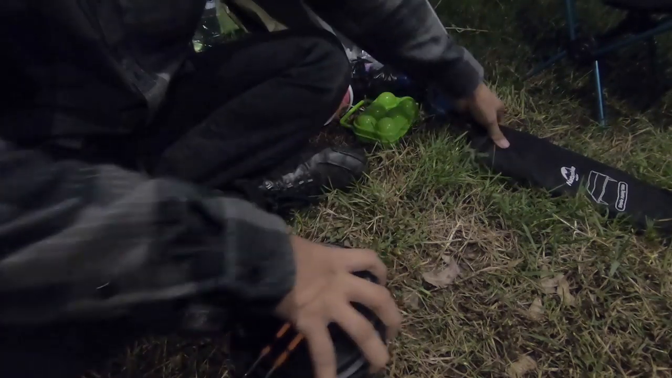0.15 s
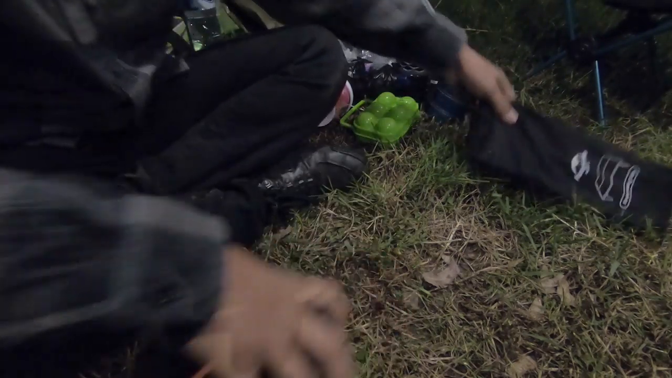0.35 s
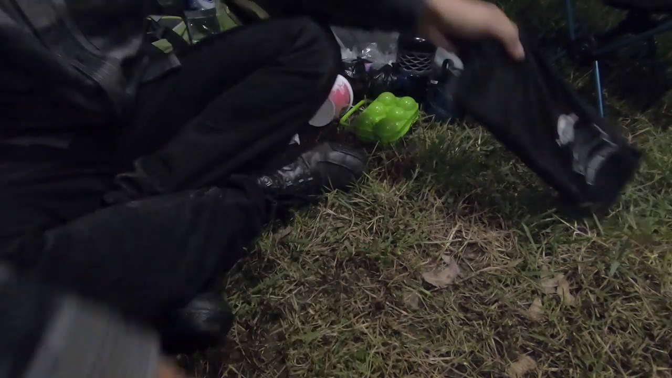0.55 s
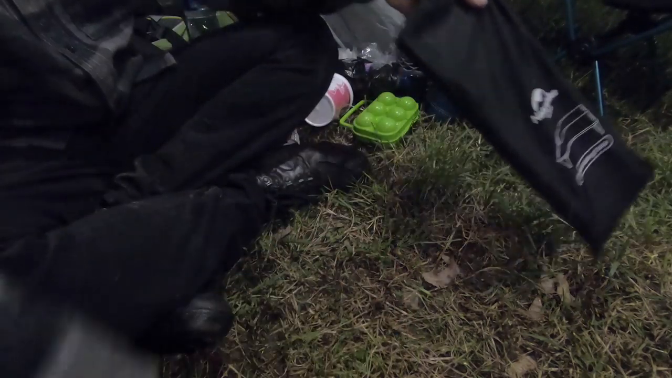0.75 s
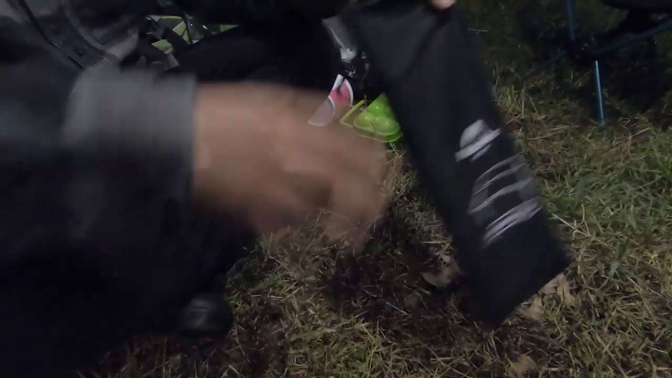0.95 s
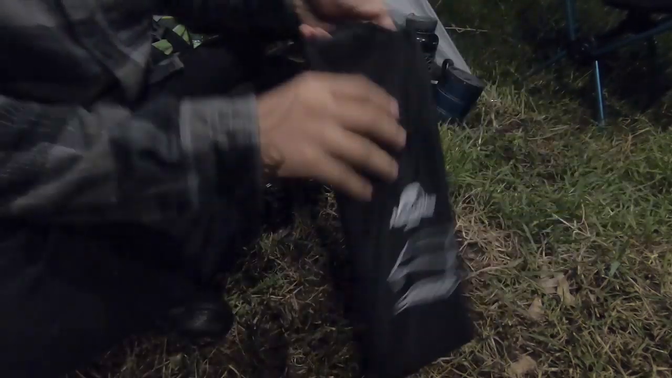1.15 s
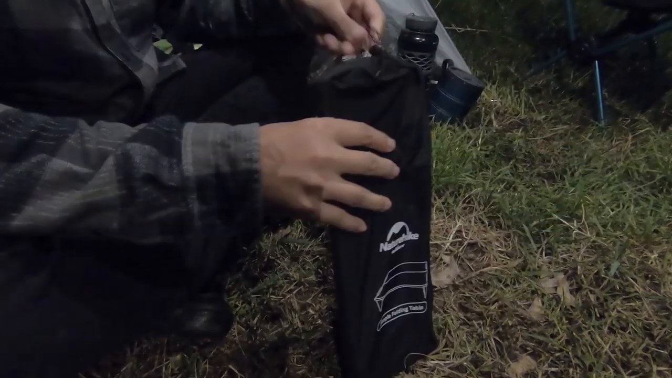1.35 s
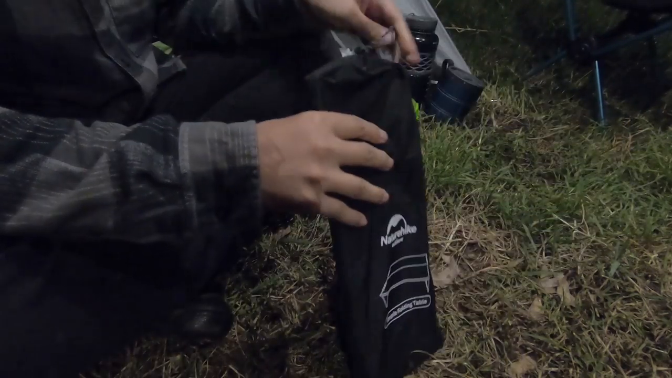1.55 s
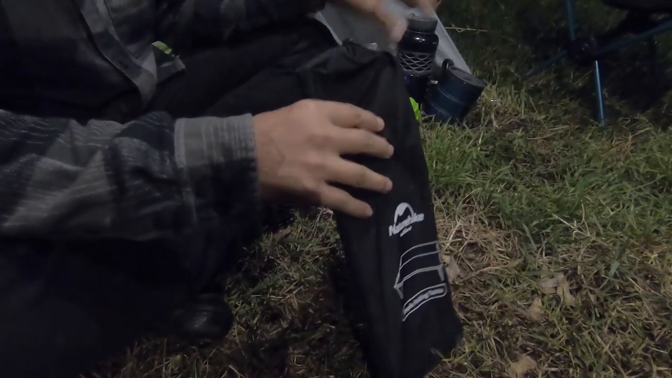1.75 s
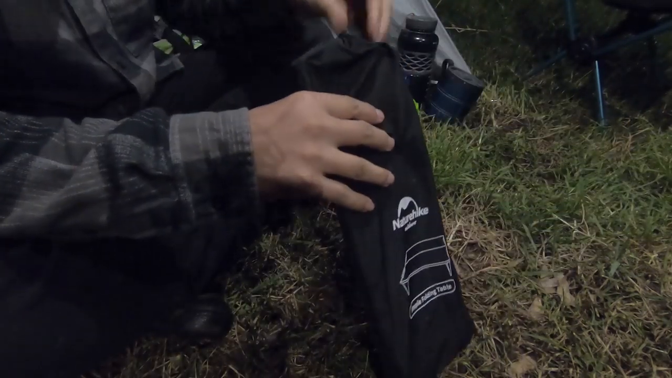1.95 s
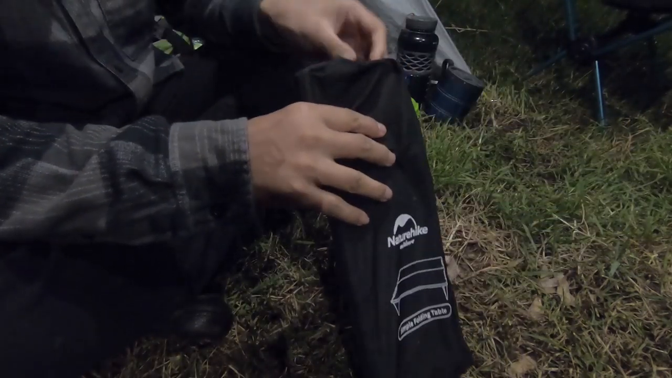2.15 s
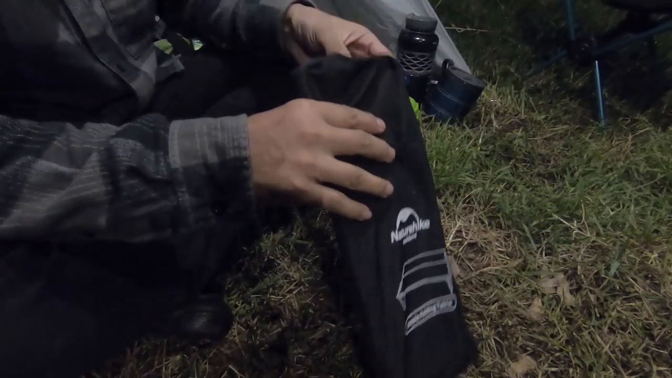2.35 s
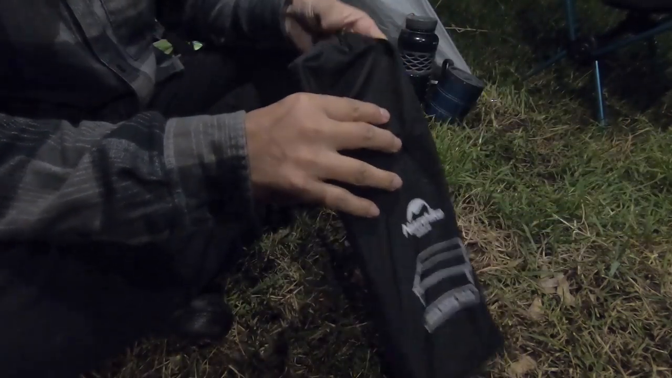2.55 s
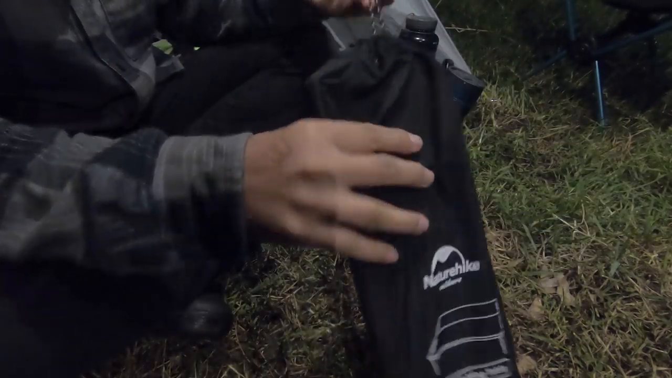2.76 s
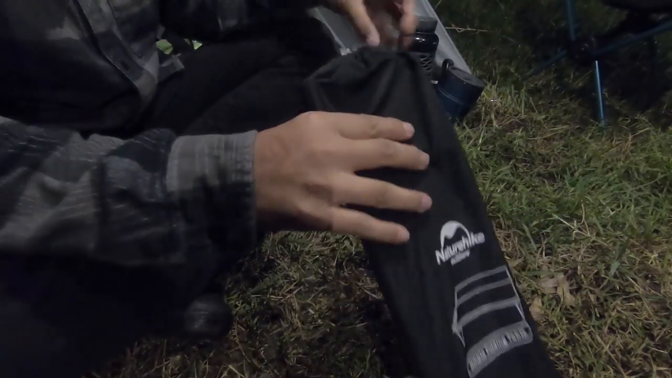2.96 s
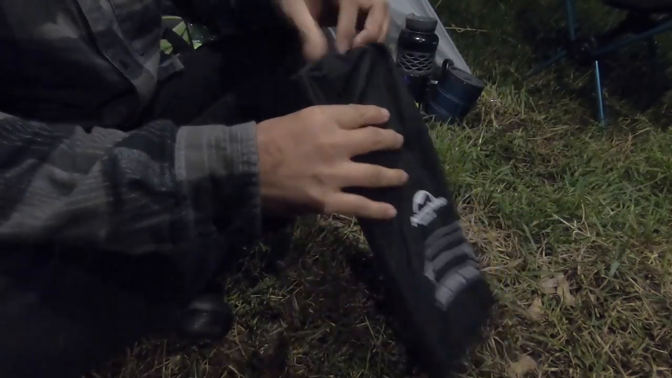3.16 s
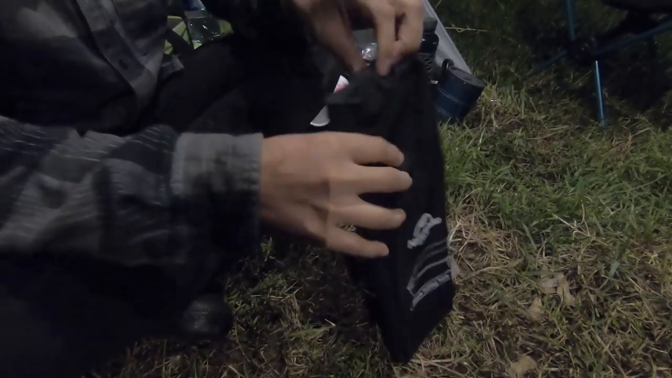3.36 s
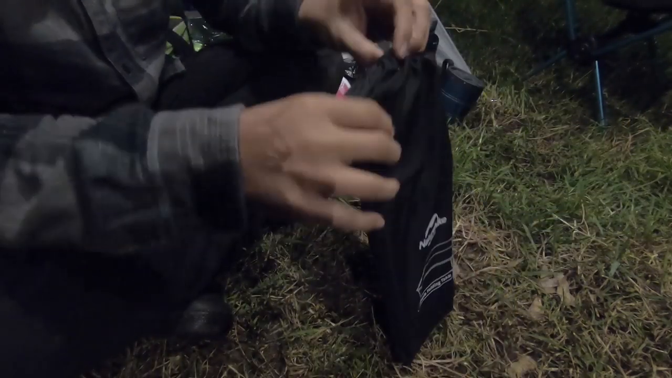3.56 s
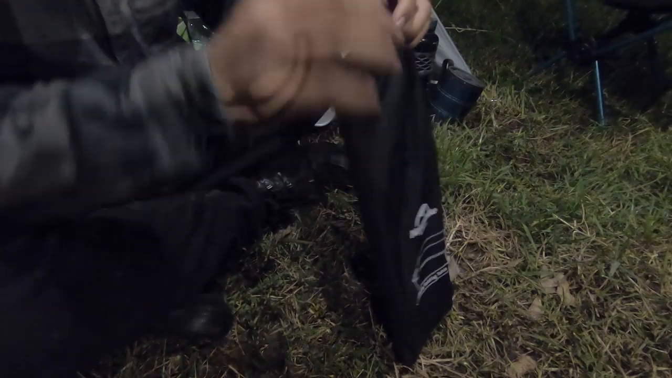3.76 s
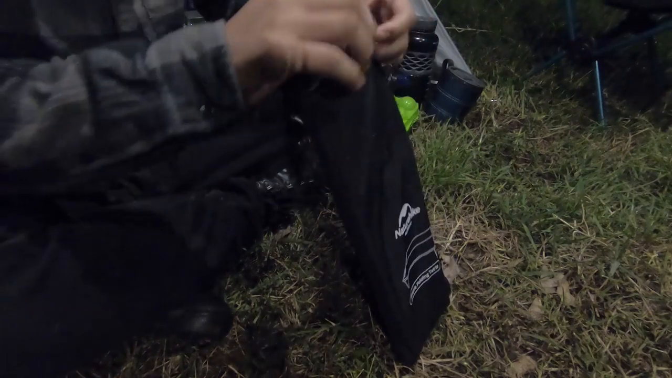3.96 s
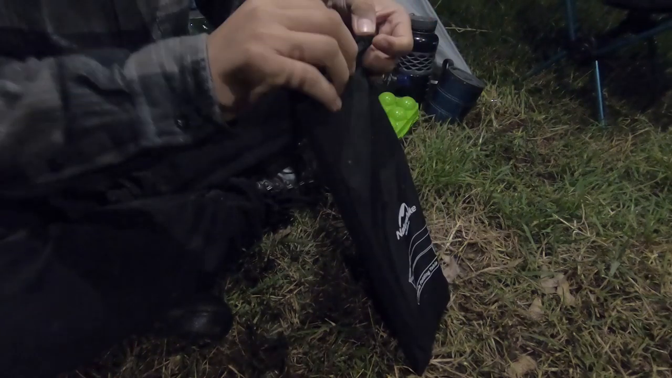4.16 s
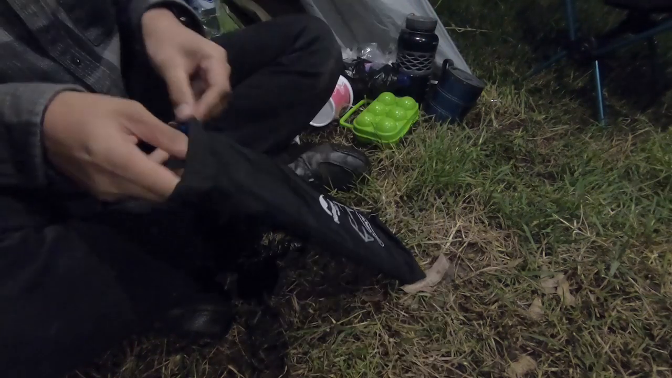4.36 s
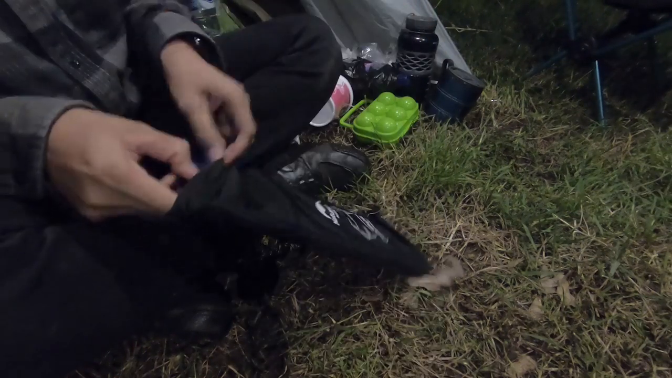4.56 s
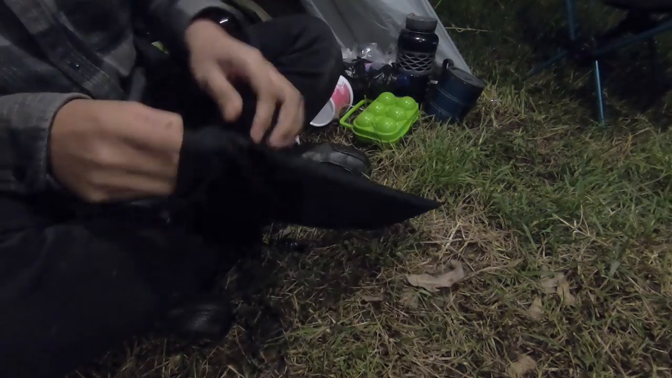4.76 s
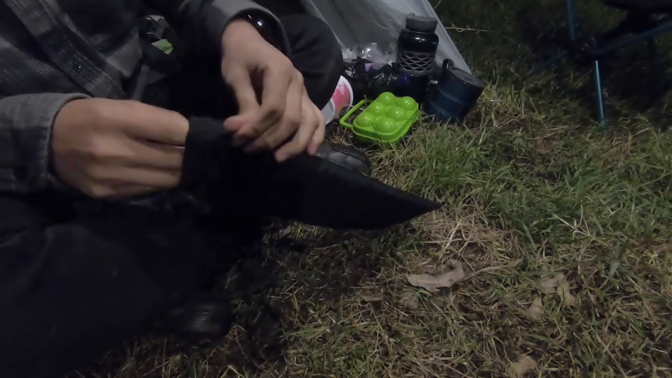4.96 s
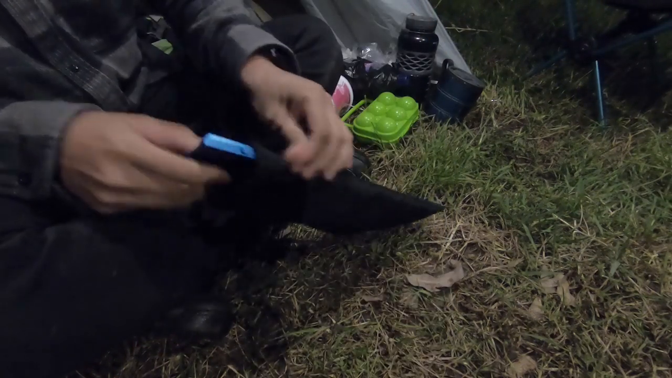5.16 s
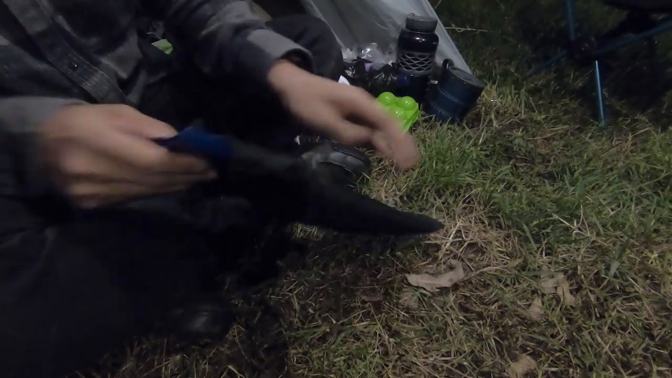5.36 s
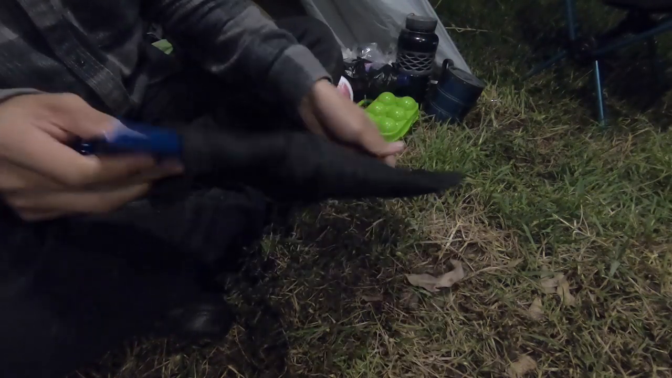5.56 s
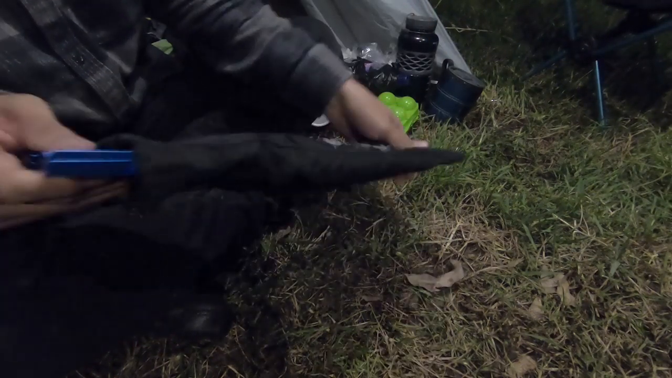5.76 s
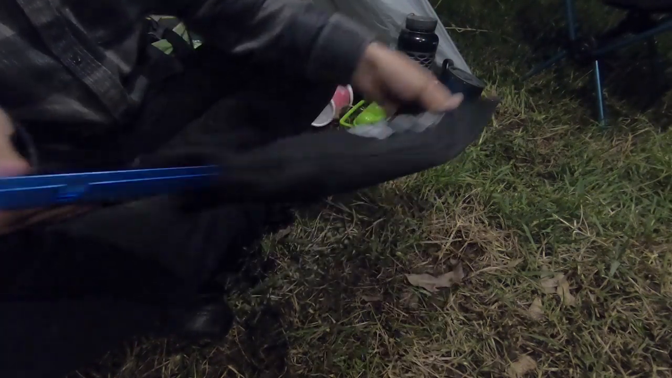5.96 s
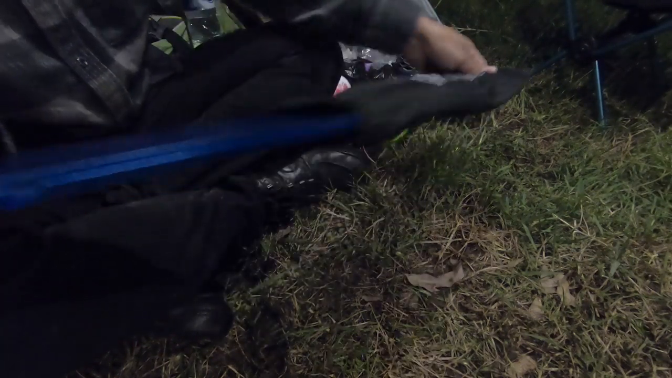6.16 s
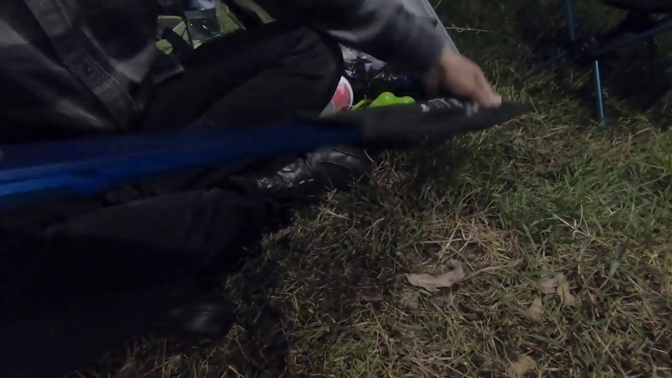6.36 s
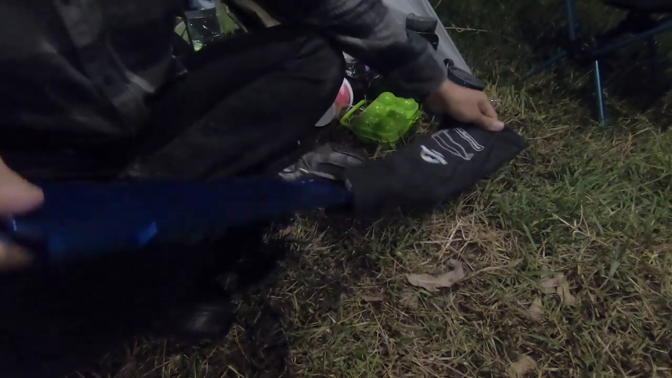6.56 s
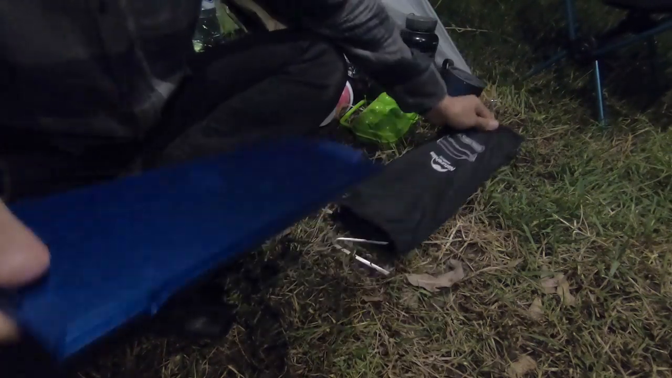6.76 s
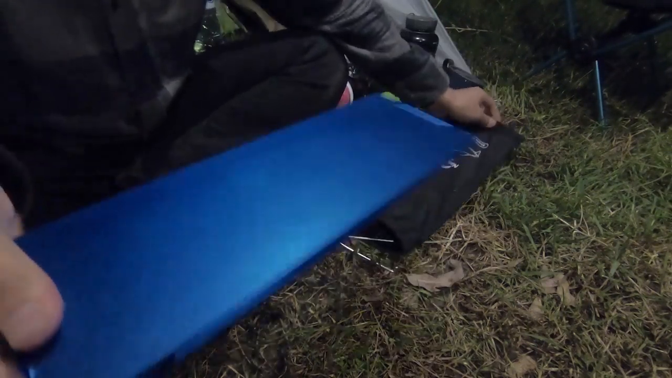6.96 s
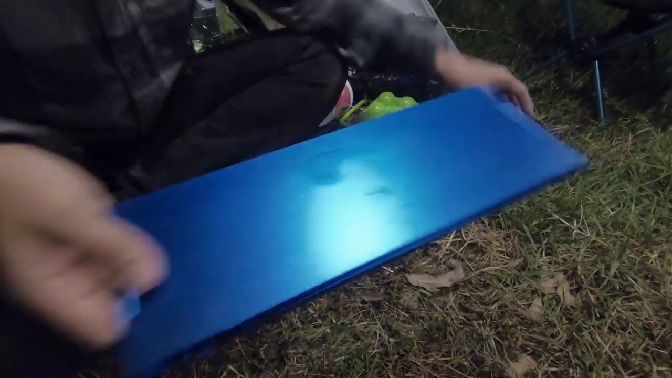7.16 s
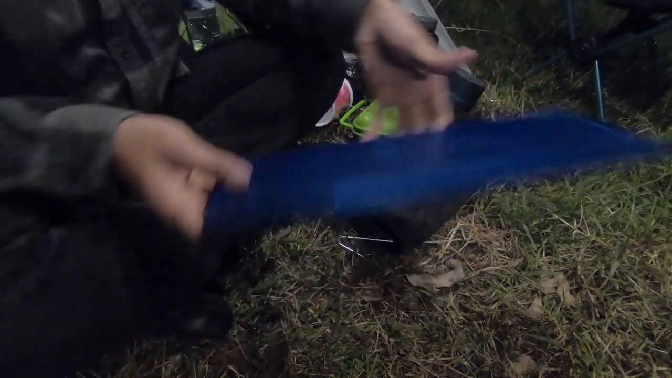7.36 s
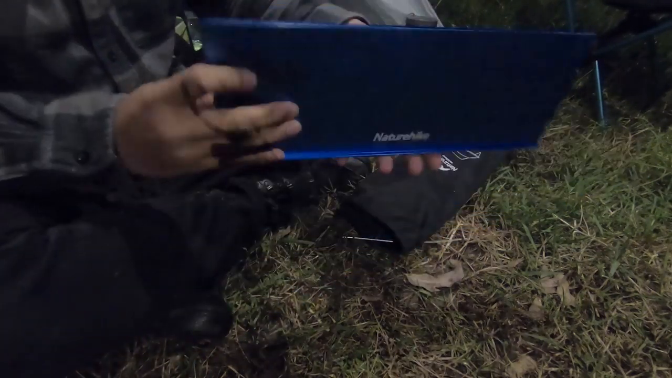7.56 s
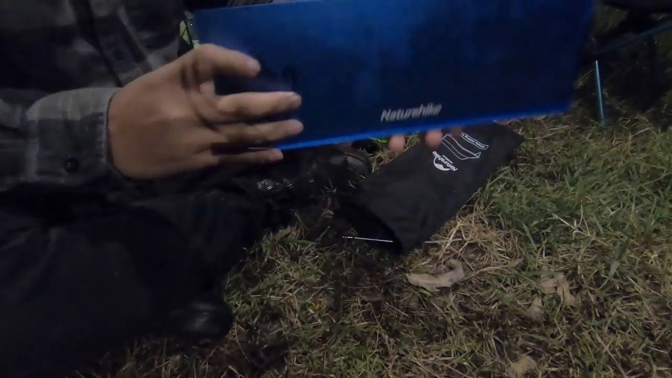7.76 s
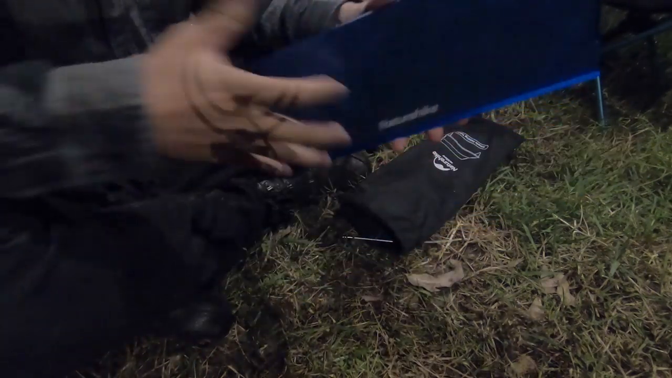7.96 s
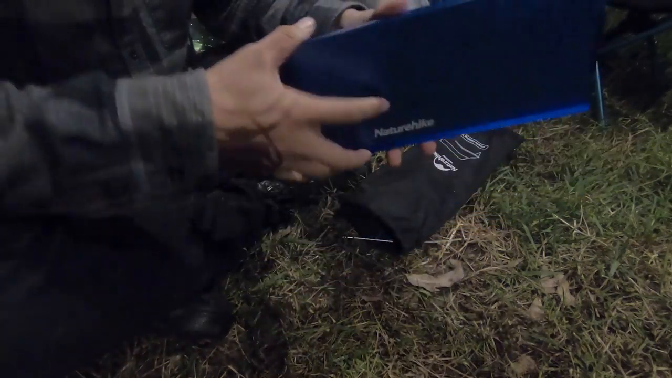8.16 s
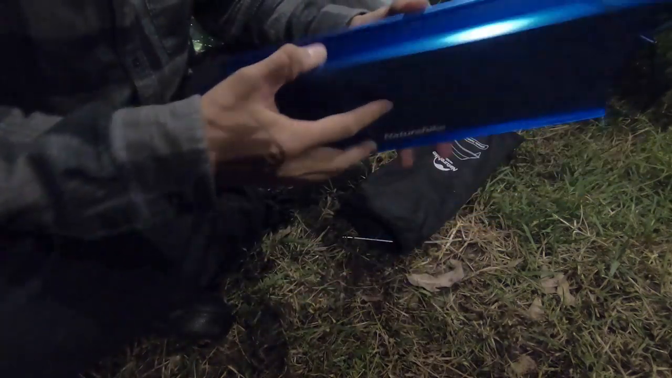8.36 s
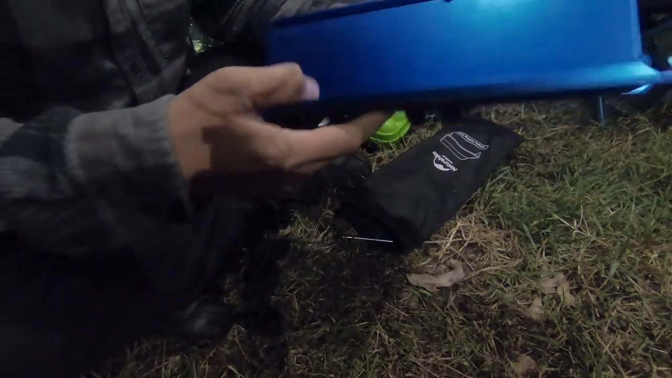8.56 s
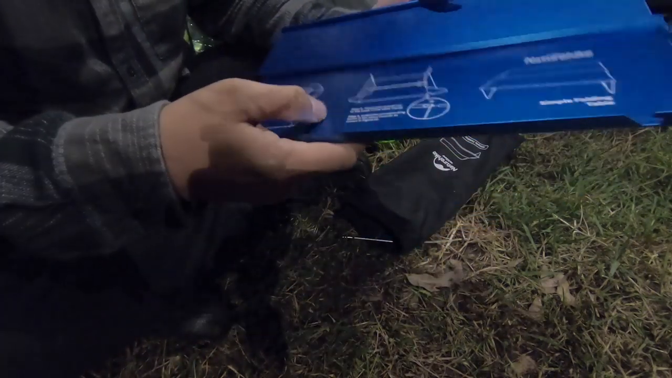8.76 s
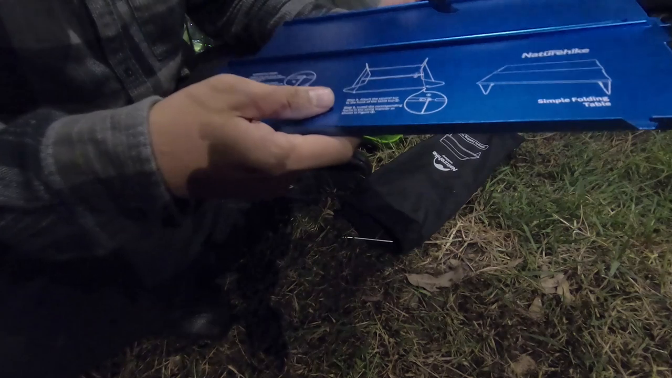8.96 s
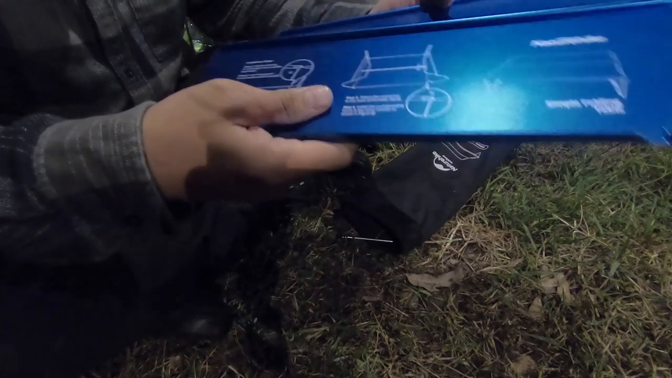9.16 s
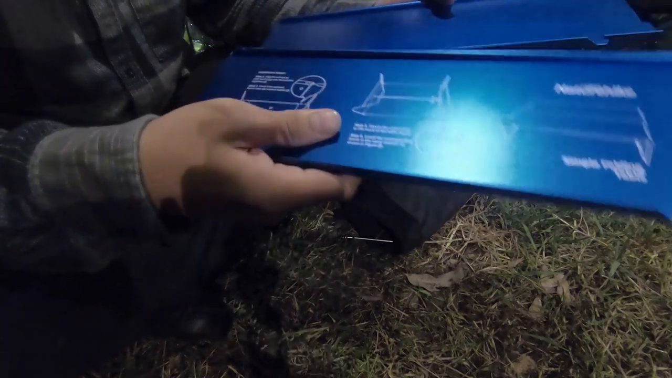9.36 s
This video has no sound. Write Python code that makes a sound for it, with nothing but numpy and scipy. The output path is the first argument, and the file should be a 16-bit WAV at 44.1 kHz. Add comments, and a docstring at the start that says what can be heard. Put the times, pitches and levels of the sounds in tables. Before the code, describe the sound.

Close by, a nylon sack is handled with soft rustles and a few dull knocks from the metal inside. About halfway, a folded metal camp table slides out with a loud, crackly scrape. Its thin panels then click, clack and ring briefly as they are opened. Crickets chirp throughout over a faint distant hum outdoors at night, and an occasional puff of air thumps the microphone.

```python
"""Unpacking a camp table at dusk

On a campsite lawn, hands lift a nylon sack, undo its cord, slide out a folded sheet-metal table and
open it. Cloth and metal crackle and scrape by stick-slip friction; knocks ring the panels' modes.
Puffs of air hit the right microphone port, and crickets chirp with their wings over a far hum."""
import sys
import numpy as np
from scipy import signal
from scipy.fft import rfft, irfft, next_fast_len
from scipy.io import wavfile
from scipy.ndimage import uniform_filter1d

SR = 44100
rng = np.random.default_rng(int(sys.argv[2]) if len(sys.argv) > 2 else 0)


def transcribe(u):
    """Save the signal u as a 16-bit wav file named by the first command-line argument.

    u: samples, shape (n,) or (channels, n), limited to [-1, 1]; the rate is SR.
    q: integer samples, one column per channel.
    """
    v = np.clip(np.atleast_2d(u).T, -1, 1)
    q = np.round(v * 32767).astype(np.int16)
    wavfile.write(sys.argv[1], SR, q)


N = 415422
FFT_SIZE = next_fast_len(N)
T, HZ = np.arange(N) / SR, np.fft.rfftfreq(FFT_SIZE, 1 / SR)
PULL_S, BARE_S, OPEN_S = 5.2, 7.3, 8.25  # the table starts to leave the sack; is out; is unfolded


def sack_and_table():
    """Source and filter: friction and impacts excite a treble band, a body band and the panel modes."""
    # Spectra and tints. Each row: frequency in Hz, relative level in dB.
    fizz = [(2500, -21.5), (3500, -21), (5000, -13.5), (6100, -1.5), (6900, 5), (8000, -4), (10500, -15.5),
            (13800, -31), (15000, -40), (15900, -74)]  # treble of rubbing, with the port resonance
    hollow = [(150, -17), (250, -11.5), (475, -24.5), (742, 1.5), (890, -0.5), (1340, 1), (1530, -1),
              (2080, 2.5), (4500, -1), (5850, -0.5), (9900, -120)]  # body of the sack and table
    scrape = [(300, -16), (800, -10), (1250, 1), (6500, -2.5), (11000, 4)]  # sliding metal is thinner and brighter than a knock
    muffled = [(350, 4.5), (1200, 0.5), (3500, -5)]  # the closed sack dulls the body
    flutter_db = .7 * drift(.008) + .7 * drift(.03)
    treble, body = gain_of(rubbing() + flutter_db)
    snap, struck = knocks()
    grit = creased(slips(per_s=24000, spread_db=1.2), patchy_db=4)
    pulled = T > PULL_S
    slide = colour(grit * treble * pulled, fizz, scrape) + colour(grit * body * pulled, hollow, scrape)
    packed = colour(grit * np.sqrt(body ** 2 + struck) * ~pulled, hollow, muffled)
    crackle = colour(grit * np.sqrt(snap + treble ** 2 * ~pulled), fizz)
    clatter = colour(grit * np.sqrt(struck) * pulled, hollow)
    drive = grit[0] * np.sqrt(struck + 0.092 * body ** 2)  # blows ring the metal more than rubbing does
    folded = gain_of(-15) * panels(drive, BARE_S, OPEN_S, t60_at_1k=.09)  # stacked panels damp each other
    unfolded = gain_of(0.5) * panels(drive, OPEN_S, T[-1], t60_at_1k=0.33)
    return ports(slide + packed + crackle + clatter + folded + unfolded + thuds())


def rubbing():
    """Incoherent sources add in power: strokes over a faint rustle give treble and body levels in dB."""
    # Strokes of cloth, cord and panels. Each row: time of full pressure and hold in seconds,
    # treble and body levels in dB, rise and fade in dB per second.
    strokes = [(0.195, 0.21, -63.5, -62, 120, 100), (0.456, 0.022, -65, -49, 206, 116),
               (0.535, 0.24, -59.5, -61.5, 100, 200), (1.143, 0.017, -57, -49.5, 193, 133),
               (1.256, 0.015, -54, -48, 500, 203), (2.593, 0.2, -58, -48, 1500, 233),
               (3.29, 0.044, -47.5, -34.5, 504, 400), (4.437, 0.074, -58, -52, 250, 155),
               (4.603, 0.24, -62.5, -60, 60, 64), (5.145, 0.2, -58, -56.5, 202, 156),
               (5.347, 0.084, -29.5, -33, 518, 246), (5.701, .01, -39, -43.5, 700, 202),
               (5.807, 0.023, -51, -41.5, 127, 104), (5.95, 0.19, -24.5, -33, 300, 310),
               (6.199, 0.0081, -19.5, -30.5, 207, 702), (6.283, 0.337, -33, -43.5, 300, 1004),
               (6.588, 0.036, -26, -33.5, 300, 799), (6.727, .01, -55, -58, 500, 304),
               (7.515, 0.017, -57, -50.5, 180, 115), (8.356, 0.14, -57, -46.5, 136, 300),
               (8.459, 0.095, -49, -40.5, 500, 142), (8.747, 0.084, -40.5, -36, 195, 300),
               (8.966, 0.03, -32, -34, 314, 212)]
    # Rustle of hands and sleeves. Each row: time in seconds, treble and body levels in dB.
    fidget = [(0, -70, -61.5), (1.2, -68, -66.5), (1.5, -87, -76), (2.5, -75, -69.5), (3.1, -70, -58.5),
              (3.5, -68, -63), (3.8, -72, -68.5), (4.3, -69, -66.5), (6.5, -77, -54), (6.9, -66, -65),
              (7.5, -75, -71.5), (8.0, -85, -102), (8.3, -69, -76), (9.42, -94, -88)]
    s, treble_db, body_db = np.transpose(fidget)
    power = gain_of(2 * np.array([np.interp(T, s, treble_db), np.interp(T, s, body_db)]))
    for s, hold, treble_db, body_db, rise, fade in strokes:
        begin = max(s - .5, 0)
        t = T[:SR] + begin - s
        down_db = np.maximum(0, np.maximum(-rise * t, fade * (t - hold)))
        add(power, begin, gain_of(2 * (np.array([[treble_db], [body_db]]) - down_db)))
    return 10 * np.log10(power)


def knocks():
    """Impact decay: each blow rattles briefly and dies, giving treble and body power envelopes."""
    # Each row: start in seconds, treble level in dB, body relative to it in dB, 60 dB decay in seconds.
    blows = [(0.1337, -54, 10.5, 0.14), (0.466, -39.5, -3, 0.052), (1.145, -35, 4.5, 0.1),
             (1.1697, -24.5, 3, 0.1), (1.2747, -40.5, 7.5, 0.083), (1.3114, -31, 0.5, 0.049),
             (1.521, -55.5, 8.5, 0.062), (3.1294, -46.5, 18, 0.061), (3.2986, -27.5, 3, 0.11),
             (3.3193, -21.5, 1.5, 0.066), (4.545, -45, 10, 0.051), (4.582, -47, -10, 0.06),
             (4.965, -55, 6, 0.047), (5.32, -32, -2, 0.11), (5.5564, -21, -8.5, 0.11),
             (5.572, -34.5, 2, 0.13), (5.6357, -25, -9, 0.13), (5.764, -22.5, -9, 0.069),
             (5.8052, -18.5, -11.5, 0.12), (5.864, -18.5, -8, 0.075), (6.236, -24, -15, 0.068),
             (6.258, -23.5, -7.5, 0.11), (6.334, -26.5, -22, 0.088), (6.375, -26, -3.5, 0.043),
             (6.388, -24, -13, 0.068), (6.441, -29.5, -4.5, 0.057), (6.512, -28.5, -8, 0.087),
             (6.538, -37, -9, 0.042), (6.607, -27, -12, 0.048), (6.772, -47.5, -5, 0.074),
             (7.5088, -20, -17.5, 0.045), (7.5727, -19.5, -3, 0.067), (7.6171, -20, 0.5, 0.075),
             (7.7302, -23.5, -3, 0.1), (8.073, -34.5, 0.5, 0.08), (8.318, -29, -10, 0.071),
             (8.398, -39, -2.5, 0.099), (8.4533, -25, -4.5, 0.079), (8.4828, -36.5, 6, 0.12),
             (8.6685, -28.5, -2.5, 0.13), (8.701, -25.5, -6, 0.098), (8.7475, -30.5, -29, 0.066),
             (9.003, -20, -7, 0.15), (9.105, -40, -2.5, 0.1)]
    t, snap, struck = T[:SR // 4], np.zeros(N), np.zeros(N)
    for s, db, body_db, t60 in blows:
        power = gain_of(2 * (db - 60 * (t / t60) ** 1.204)) * np.minimum(t / 0.0028, 1)
        add(snap, s, power)
        add(struck, s, power * gain_of(2 * body_db))
    return snap, struck


def slips(per_s, spread_db):
    """Stick-slip friction: dense clicks of uneven size, in two independent strands."""
    size = gain_of(spread_db * np.minimum(rng.exponential(1, N), 4))
    slipping = rng.random(N) < per_s / SR
    return unit_rms(size * slipping * rng.standard_normal((2, N)))


def creased(x, patchy_db):
    """Shifting folds and contacts make resonances come and go; the ports lose coherence in the treble."""
    hz, _, z = signal.stft(x, SR, nperseg=512, noverlap=384)
    coherence = read([(3000, 1.0), (14000, 0.48)], hz)[:, None]
    patches = smooth_patches(rng.standard_normal(z.shape[:0:-1]).T, bins=2, frames=20)
    z = cohere(z[0], z[1], coherence) * gain_of(patchy_db * patches)
    return unit_rms(signal.istft(z, nperseg=512, noverlap=384)[1][:, :N])


def panels(drive, start, end, t60_at_1k):
    """Modal resonance: two leaves make each mode a close pair; shifting grip varies their strengths."""
    # Modes of the metal panels. Each row: frequency in Hz, relative level in dB.
    modes = [(358, -10.5), (515, -11.5), (760, -10), (1000, -3), (1131, 1), (1358, 0), (1980, -12),
             (2150, 2.5), (2810, -5), (3487, 5), (4600, 4.5), (6250, 4), (6590, 0)]
    split, grip_db, grip_s = 1.025, 3, .15
    t, part, out = T[:SR // 3], slice(round(start * SR), round(end * SR)), np.zeros(N)
    hz, db = np.transpose(modes)
    hz, db = np.r_[hz, hz * split][:, None], np.r_[db, db - 3.0][:, None]
    t60 = t60_at_1k * (1000 / hz) ** .5
    rings = gain_of(db - 60 * t / t60) * np.sin(2 * np.pi * hz * t)
    knots = np.arange(start, end + grip_s, grip_s)
    grips = grip_db * rng.standard_normal((len(knots), len(hz))).T
    for ring, grip in zip(rings / np.linalg.norm(rings), grips):
        gripped = drive[part] * gain_of(np.interp(T[part], knots, grip))
        add(out, start, signal.fftconvolve(gripped, ring))
    return out


def thuds():
    """Damped oscillation: each thud or ping is one hollow mode, and higher ones die sooner."""
    # Each row: start in seconds, level in dB, frequency in Hz.
    hits = [(.137, -43, 780), (.675, -34, 191), (.72, -33, 203), (1.172, -26.5, 729), (1.265, -37.5, 222),
            (1.312, -22.5, 6080), (3.325, -39, 209), (4.545, -47, 226), (4.965, -46.5, 955),
            (5.866, -34, 170.7), (7.575, -35.5, 261), (7.618, -32, 776), (7.62, -19, 2130),
            (7.732, -34, 750), (7.734, -25, 2030), (8.074, -36.5, 753), (8.455, -32, 181),
            (8.485, -28, 278), (8.565, -39.5, 173), (8.669, -28.5, 320), (9.003, -20, 1064)]
    out, t = np.zeros(N), T[:SR // 4]
    for s, db, hz in hits:
        t60 = 2.14 / hz ** .5
        add(out, s, gain_of(db - 60 * t / t60) * np.sin(2 * np.pi * hz * t) * np.minimum(t * hz, 1))
    return out


def ports(x):
    """Near-field pickup: each microphone port hears a close sound with its own level and phase."""
    # Each row: frequency in Hz, left minus right level in dB.
    level_gap = [(300, -1), (700, -2), (1300, 5), (2400, 1), (4400, 0), (6600, -11.5), (9000, -1),
                 (15000, -3)]
    # Each row: frequency in Hz, phase lead of the left port in radians.
    phase_lead = [(300, 1.5), (780, 0.85), (2580, 0.85), (5430, -2), (6630, 1.55), (7670, 4), (12000, 4.5)]
    half = gain_of(read(level_gap, HZ) / 2) * np.exp(.5j * read(phase_lead, HZ))
    return filtered(x, np.array([half, 1 / half]))


def air():
    """Pressure fluctuations, mainly at the right port; each puff rings the microphone's low corner."""
    # Air moving over the port. Each row: time in seconds, relative level in dB.
    breeze = [(0, -46), (.2, -82), (1.9, -63.5), (2.9, -53.5), (4.1, -54), (4.9, -77), (6.8, -90),
              (7.6, -59), (8.1, -65), (8.8, -57), (9.42, -65)]
    # Air pushed by the sack and arms. Each row: start in seconds, level in dB, frequency in Hz.
    pushes = [(.038, -32.5, 64), (.681, -27, 53.3), (.714, -22, 42.4), (0.761, -18, 41), (1.302, -16, 49.7),
              (1.339, -14.5, 53.7), (3.323, -3, 59), (3.363, -4.5, 53.8), (3.399, -19, 64.5),
              (3.435, -20, 46.6)]
    # Each row: frequency in Hz, relative level in dB.
    spectrum = [(12, -43.0), (30, -41.0), (52, 2.5), (90, -28.5), (130, -4.0), (300, -65)]
    s, db = np.transpose(breeze)
    rumble = colour(rng.standard_normal((2, N)), spectrum)
    gusts_db = 3 * drift(.05)
    rumble *= gain_of(np.interp(T, s, db) + gusts_db + np.array([[-4], [4.5]]))
    puffs, t = np.zeros(N), T[:SR // 2]
    for s, db, hz in pushes:
        envelope = gain_of(db - 60 * t / 0.17) * np.minimum(t / 0.012, 1)
        add(puffs, s, envelope * np.sin(2 * np.pi * hz * t))
    return rumble + puffs * np.array([[.16], [-1]])


def crickets():
    """Stridulation: runs of wing strokes from nearby crickets and five far ones."""
    # Near chirps. Each row: times of the first and last strokes in seconds, relative level in dB.
    chirps = [(2.414, 2.538, -57), (2.597, 2.721, -49), (3.953, 4.058, -56), (4.12, 4.24, -46.5),
              (4.714, 4.891, -45.5), (5.14, 5.261, -44.5), (6.909, 7.082, -47), (7.372, 7.549, -45.5),
              (8.559, 8.614, -43.5), (9.075, 9.196, -47)]
    spacing_s = .059
    near, far = np.zeros(N), np.zeros((2, N))
    for first, last, db in chirps:
        for s in np.linspace(first, last, round((last - first) / spacing_s) + 1):
            weak_db = -2.5 * (s == first)  # the opening stroke is the softest
            stroke = wing_stroke(rng.normal(1, 0.015), rng.normal(1, 0.0018))
            add(near, s - .006, gain_of(db + weak_db) * stroke)
    for period_s in np.linspace(.24, .33, num=5):
        pan_db = 3 * rng.standard_normal() * np.array([[1], [-1]])
        for s in np.arange(rng.random() * period_s, N / SR - .3, period_s):
            for k in range(4):
                gain = gain_of(rng.normal(-69, 2) + pan_db)
                add(far, s + spacing_s * k, gain * wing_stroke(0.94, rng.normal(1, 0.0161)))
    return near * gain_of([[-1.5], [1.5]]) + far


def wing_stroke(stretch, hz_factor):
    """Interference: a tone that falls as the wing closes beats against its ground echo."""
    # Each row: nominal time in seconds, nominal pitch in Hz.
    glide = [(0, 4660), (0.017, 4543), (.026, 4318), (.034, 3970)]
    s, hz = np.transpose(glide)
    t = T[:round(s[-1] * stretch * SR)]
    pitch = hz_factor * np.interp(t, s * stretch, hz)
    envelope = (t / t[-1]) ** 0.46 * signal.windows.tukey(len(t), .3)
    tone = envelope * np.sin(2 * np.pi * np.cumsum(pitch) / SR)
    lag = round(0.0046 * SR)
    return np.pad(tone, (0, lag)) + 0.76 * np.pad(tone, (lag, 0))


def night():
    """Partly coherent noise: far hum and insect hiss, with drifting patches in the spectrum."""
    # Each row: frequency in Hz, relative level in dB.
    spectrum = [(70, -6), (120, -5), (170, 5), (260, -14), (480, -22), (780, -12.5), (1000, -18.5),
                (1300, -9.5), (2000, -28.5), (5200, -24.5), (6900, -7.5), (8400, -35), (15900, -55.5)]
    # Each row: frequency in Hz, left-right correlation from -1 to 1.
    correlation = [(60, 0.93), (240, 0.34), (950, -0.88), (3770, 0.66), (15000, -0.76)]
    level_db = -55.5 + np.array([[.7], [2.5]])  # left, right
    frames, hz = N // 256 + 5, np.fft.rfftfreq(1024, 1 / SR)
    re1, im1, re2, im2, chance = rng.standard_normal((frames, 513, 5)).T
    z = cohere(re1 + 1j * im1, re2 + 1j * im2, read(correlation, hz)[:, None])
    z *= gain_of(read(spectrum, hz)[:, None] + 1.4 * smooth_patches(chance, bins=10, frames=14))
    return gain_of(level_db) * unit_rms(signal.istft(z, nperseg=1024, noverlap=768)[1][:, :N])


def cohere(left, other, correlation):
    """Partial coherence: two independent noises mix into a correlated stereo pair."""
    return np.array([left, correlation * left + np.sqrt(1 - correlation ** 2) * other])


def smooth_patches(noise, bins, frames):
    """Averaging over frequency and time turns noise into patches of rms 1."""
    return unit_rms(uniform_filter1d(uniform_filter1d(noise, bins, axis=0), frames, axis=1))


def drift(width_s):
    """Low-passed noise: a slow random wander of rms 1."""
    size = round(width_s * SR)
    return unit_rms(uniform_filter1d(uniform_filter1d(rng.standard_normal(N), size), size))


def colour(x, spectrum, tint=((1, 0),)):
    """Spectral shaping by a curve that keeps white noise at its rms, then by a tint."""
    return filtered(x, unit_rms(gain_of(read(spectrum, HZ))) * gain_of(read(tint, HZ)))


def filtered(x, gain):
    """Linear filtering by a gain given at the frequencies HZ."""
    return irfft(rfft(x, FFT_SIZE) * gain, FFT_SIZE)[..., :N]


def read(points, hz):
    """Interpolation on a log-frequency axis."""
    f, value = np.transpose(points)
    return np.interp(np.log(hz + 1), np.log(f + 1), value)


def add(mix, s, sound):
    """Superposition of a sound on the mix, starting at s seconds."""
    part = mix[..., round(s * SR):][..., :sound.shape[-1]]
    part += sound[..., :part.shape[-1]]


def gain_of(db):
    """Decibels to amplitude ratio."""
    return 10 ** (np.asarray(db) / 20)


def unit_rms(x):
    """Normalisation to rms 1."""
    return x / np.sqrt(np.mean(x ** 2) + 1e-20)


def scene():
    """Superposition of all sources, in stereo."""
    return sack_and_table() + crickets() + air() + night()


def record(dry):
    """Band limiting: a steep low-pass filter removes the highest treble."""
    lowpass = signal.firwin(511, cutoff=15950, window=("kaiser", 9), fs=SR)
    return signal.oaconvolve(dry, lowpass[None], "same")


dry = scene()
out = record(dry)
transcribe(out)
```